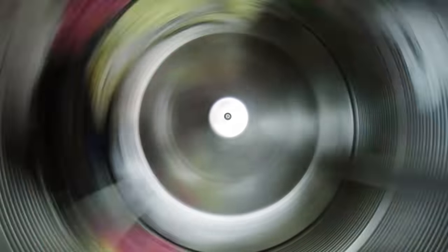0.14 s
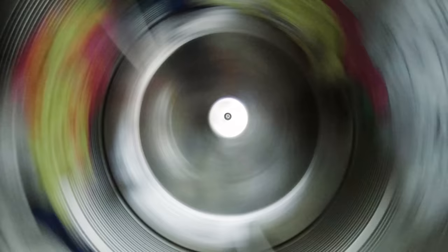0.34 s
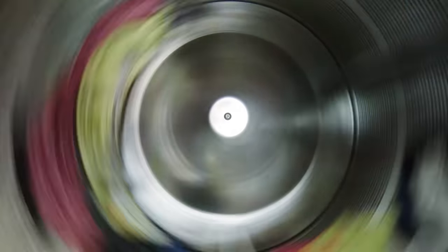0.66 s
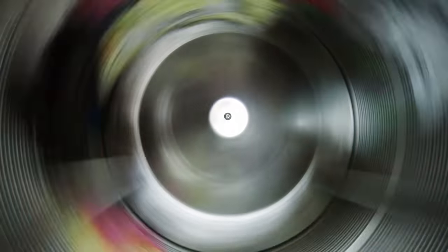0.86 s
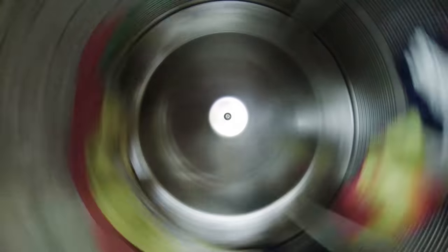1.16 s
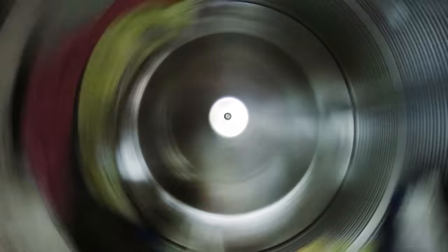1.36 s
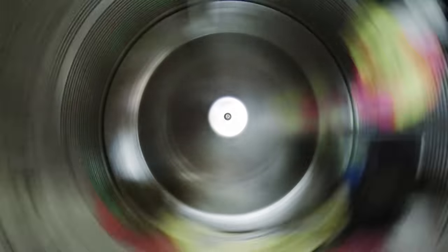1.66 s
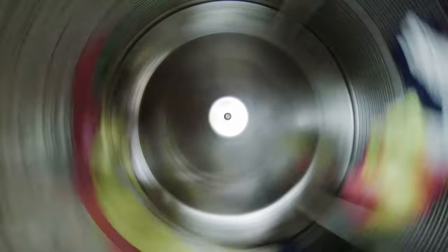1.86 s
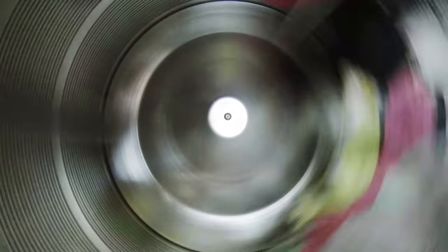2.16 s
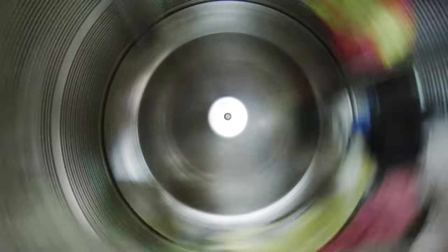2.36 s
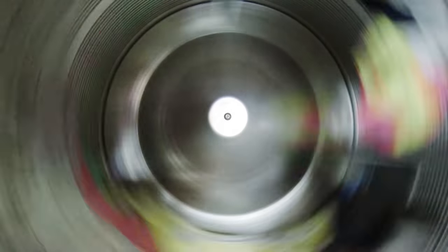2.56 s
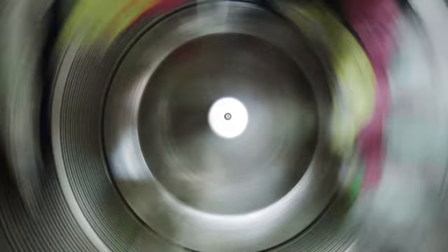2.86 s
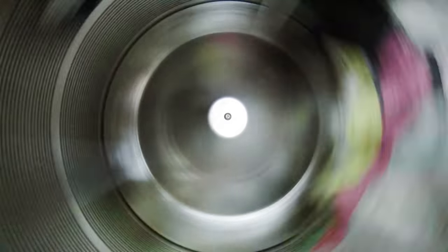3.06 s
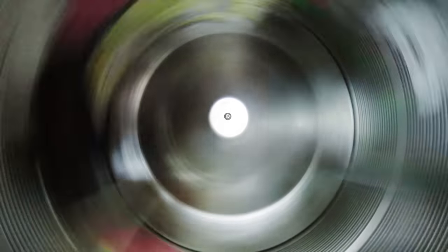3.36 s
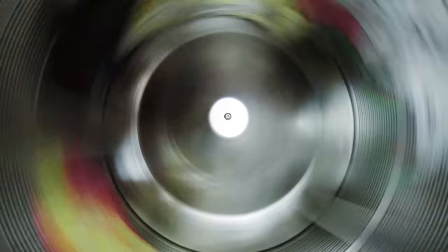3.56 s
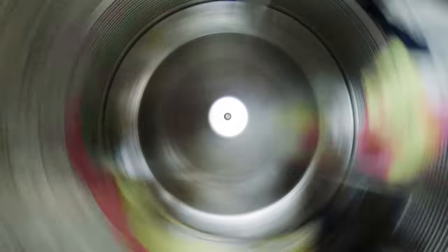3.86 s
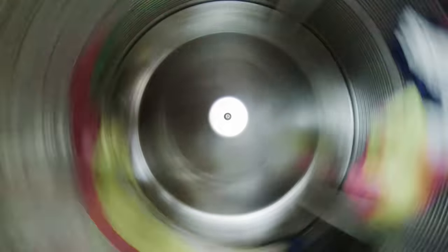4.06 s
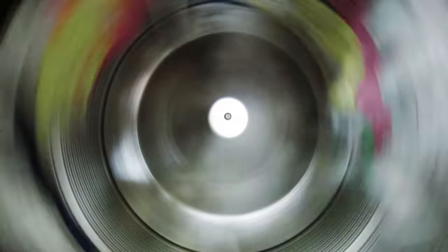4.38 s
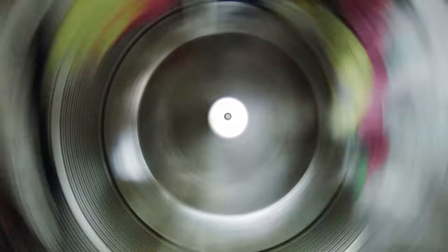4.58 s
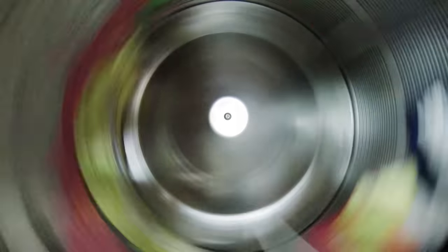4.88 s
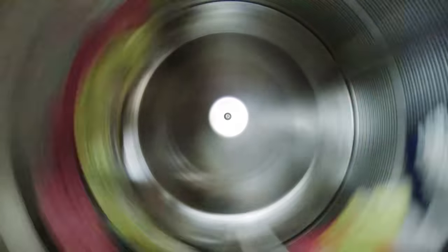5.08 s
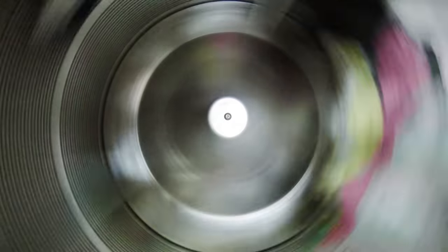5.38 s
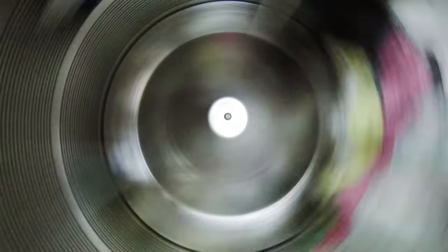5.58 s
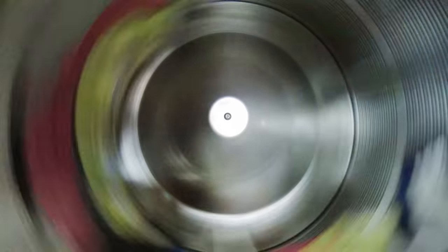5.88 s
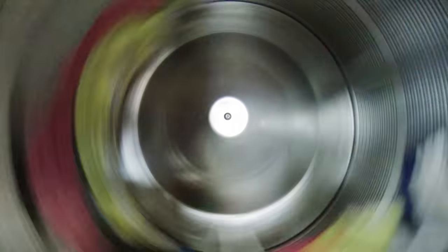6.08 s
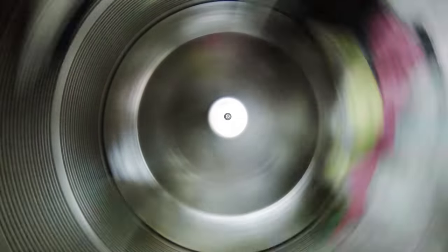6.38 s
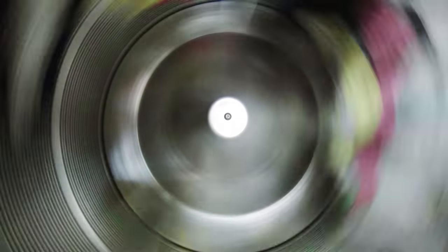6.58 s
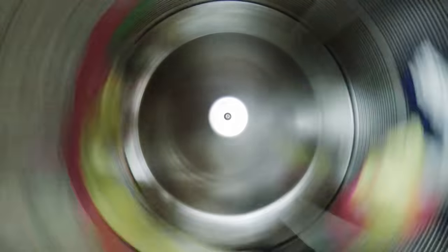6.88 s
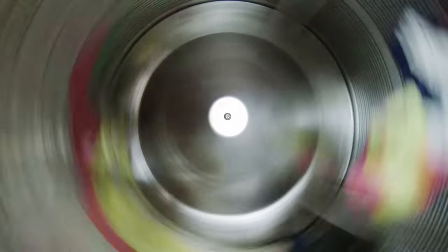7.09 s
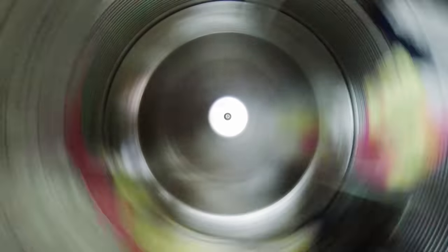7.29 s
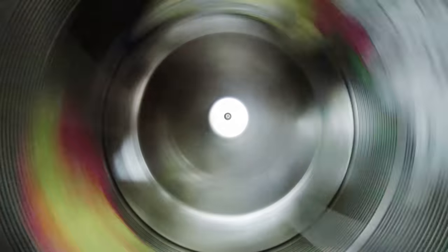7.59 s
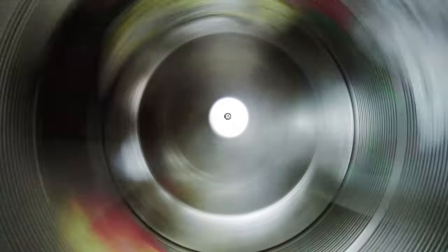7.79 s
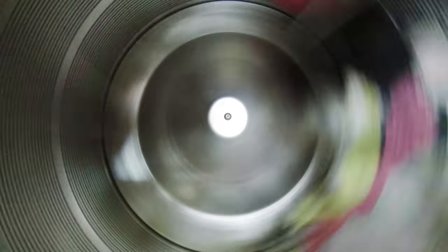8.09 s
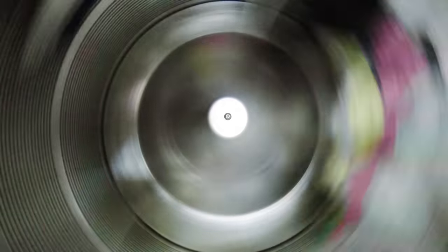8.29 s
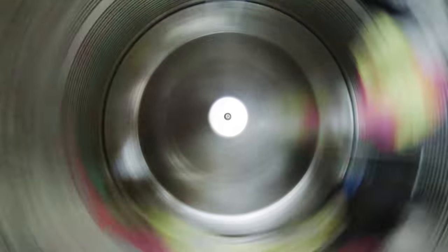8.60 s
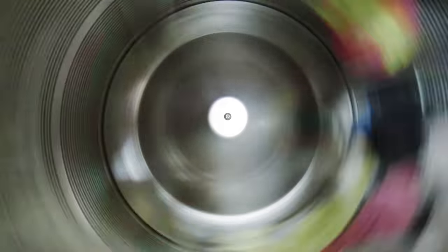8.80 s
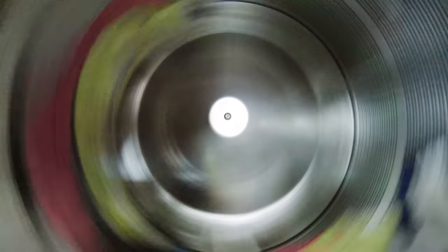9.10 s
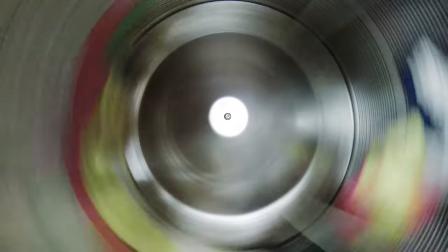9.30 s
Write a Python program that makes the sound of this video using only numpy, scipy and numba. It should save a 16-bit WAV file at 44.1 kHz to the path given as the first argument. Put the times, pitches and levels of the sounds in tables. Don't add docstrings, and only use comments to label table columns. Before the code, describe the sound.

Close up at a washing machine's steel drum gathering speed. Deep cabinet rumble and steady motor hum carry a rough, slowly rising drone. The uneven load swishes about four times a second at first, quickening past five. Dull thumps on the tub are scattered early, then come nearly every turn, with small button and zip ticks over airy drum noise. It breaks off still spinning.

```python
import sys
import numpy as np
from scipy import signal
from scipy.fft import rfft, irfft
from scipy.io import wavfile
from scipy.ndimage import uniform_filter1d
from numba import njit

SR = 44100
rng = np.random.default_rng(int(sys.argv[2]) if len(sys.argv) > 2 else 0)


def ratio(d):
    e = np.asarray(d, float) / 20
    return 10 ** e


def wav_record(signal):
    frames = np.transpose(np.atleast_2d(signal))
    bounded = np.clip(frames, -1, 1)
    quanta = np.round(bounded * 32767).astype(np.int16)
    wavfile.write(sys.argv[1], SR, quanta)


N = 416744
TIME = np.arange(N) / SR
FREQ = np.fft.rfftfreq(N, 1 / SR) + 1e-3

START_TURNS_S, GAIN_TURNS_S2, EASE_TURNS_S3 = 4.031, .177, .00288
SHAFT_ORDERS = [6.985, 7.745, 11.585, 28.485, 42.075]
SHAFT_DRIVE_DB = [-24, -28.5, -22, -29.5, -29]
# order [cycles per drum turn], level_db [dB re belt tone]
SIDE_TONES = [(25.9, -5), (26.75, -5), (23.17, -11)]
# order [cycles per drum turn], level_db [dB]
GEAR_TONES = [(58.1, -52), (69.9, -53), (74.0, -50), (135.9, -61), (150.7, -58)]
# pitch_hz [Hz], width_hz [Hz], boost_db [dB]
CASE_RESONANCES = [(31.46, 1.8, -3.5), (37.74, 3.2, -2.5), (63.6, 5.7, 1), (133.1, 20, -4), (152.9, 22, -1),
                   (208.3, 29, -0.5), (313, 45, -2.5), (681, 88, 1.5), (744, 25, 3)]
# pitch_hz [Hz], width_hz [Hz]
PANEL_MODES = [
    (36.9, 12),
    (62.8, 8.4),
    (202.1, 11.7),
    (151.4, 45),
]
PANEL_TONES = [(0, 1), (2,), (4,), (3,)]
# start_db [dB], rise_db_per_s [dB/s], wander_db [dB], swell_s [s]
PANEL_REST = [(-25.5, 0.07, 3, .06), (-31.5, 0.08, 0.5, 0.063), (-25, -0.31, 1.8, 0.044),
              (-38.5, 1.69, 3, 0.046)]
# peak_s [s], level_db [dB]
SIDE_SWELLS = [(.07, -20), (.34, -18.5), (.9, -22), (2.42, -21), (2.64, -14), (2.88, -18), (3.29, -26),
               (3.51, -18.5), (5.03, -29.5), (5.21, -17.5), (6.64, -21), (7.26, -17), (7.95, -14),
               (8.17, -13.5), (8.43, -15.5), (9.41, -17.5)]
# peak_s [s], level_db [dB]
TUB_LURCHES = [(.08, -25.5), (1.16, -28), (2.49, -21), (2.94, -24), (3.13, -20.5), (3.57, -24.5),
               (4.1, -29), (4.84, -22), (5.21, -26), (5.54, -21), (5.96, -19.5), (6.34, -24), (6.93, -17),
               (7.3, -21.5), (7.42, -19.5)]
# peak_s [s], level_db [dB]
BACK_LURCHES = [(.05, -15.5), (.27, -23.5), (.49, -21.5), (1.3, -26), (1.56, -20), (1.71, -16),
                (2.4, -16.5), (2.79, -22.5), (2.88, -22.5), (3.62, -20), (3.88, -19.5), (4.63, -15.5),
                (4.86, -15), (5.54, -18)]
# peak_s [s], level_db [dB]
FRAME_LURCHES = [(1.16, -32), (2.03, -23.5), (2.42, -25.5), (2.97, -27.5), (4.05, -21.5), (5.12, -21.5),
                 (5.42, -20.5), (8.4, -19.5), (9.3, -18)]
# pitch_hz [Hz], level_db [dB per Hz]
RUMBLE_COLOUR = [(15, -44.5), (24, -7.5), (48, 0.5), (75, -0.5), (92, -10.5), (120, -3), (160, -1.5),
                 (235, -6.5), (270, -20), (330, -20), (400, -29.5), (510, -32.5), (900, -46.5)]
# pitch_hz [Hz], level_db [dB rms]
MAINS_TONES = [(120, -35), (239.99, -38), (359.97, -49.6), (10429.6, -91), (12647.4, -96), (12707.3, -95),
               (13126.9, -92)]
# pitch_hz [Hz], level_db [dB per Hz]
ROAR_COLOUR = [(400, -29.5), (520, -17.5), (780, -23), (1040, -21.5), (1250, -11), (1550, -8), (2160, -9),
               (2660, -23), (3450, -25), (4410, -37.5), (6140, -41.5), (9000, -46.5), (13300, -49),
               (15100, -51)]
# pitch_hz [Hz], width_hz [Hz], boost_db [dB over the roar]
DRUM_AIR = [(597.6, 29, 11.5), (664, 93, 12), (739, 22, 9), (909, 230, 7), (1148, 100, 4), (1320, 35, -4.5),
            (1350, 74, 5.5), (1437, 51, 5.5), (1695, 118, 10), (1824, 75, 2), (2340, 100, -1.5),
            (2333, 100, -4), (2470, 140, 4), (2940, 130, 3.5), (3870, 330, 3), (5145, 590, 7),
            (7980, 410, 4.5), (10230, 350, 4.5), (11100, 500, 3)]
# place [share of the turn], level_db [dB]
SWEEP = [(.08, 2.1), (.2, 0.6), (.32, 1.5), (.42, -1), (.58, -2.5), (.75, -2.15), (.9, -2.3)]
# pitch_hz [Hz], level_db [dB per Hz]
HISS_COLOUR = [(2500, -18.5), (4000, -3.5), (9000, -8.0), (14000, -6), (15100, -16)]
# crest_s [s], peak_db [dB], sharp_db [dB]
KNOCKS = [(0.077, -19, -46), (0.248, -16, -39), (0.753, -9.5, -20), (1.047, -12, -30), (2.205, -11.5, -37),
          (2.877, -14.5, -38), (3.098, -16, -39), (3.747, -8, -23), (4.172, -10.5, -31),
          (4.377, -8.5, -21.5), (4.794, -12.5, -29), (5.21, -12.5, -30), (5.413, -16, -40), (5.81, -8, -24),
          (6.009, -16, -40), (6.41, -12.5, -34.5), (6.795, -9, -22), (6.988, -16.5, -36),
          (7.181, -9, -24.5), (7.37, -7, -21), (7.751, -8.5, -25), (7.936, -10.5, -26.5), (8.123, -8, -32),
          (8.307, -8, -22), (8.492, -12.5, -34), (8.677, -9, -20.5), (8.859, -8, -24.5),
          (9.045, -8.5, -28.5), (9.221, -6, -19), (9.401, -12.5, -48)]
# start_s [s], peak_db [dB], bright_db [dB]
TICKS = [(0.6004, -52.5, -59), (0.7522, -50.5, -63), (0.766, -48.5, -65), (0.7754, -61, -68),
         (1.6162, -48, -65.5), (1.9818, -61.5, -59), (2.077, -51.5, -68), (2.7283, -55.5, -70),
         (2.951, -53.5, -61.5), (2.977, -55.5, -56.5), (3.4437, -53.5, -69), (4.376, -47, -76),
         (5.679, -50.5, -66), (5.8122, -50, -66), (6.7955, -46, -64), (6.933, -49.5, -63),
         (7.1753, -48, -60), (7.2634, -58, -57), (7.3703, -46.5, -70), (7.6262, -55.5, -64),
         (8.058, -49, -67.5), (8.0651, -46, -66.5), (8.1495, -45, -71), (8.552, -50, -63),
         (8.5802, -46, -58), (8.677, -50.5, -68), (8.8083, -52, -62), (8.971, -53.5, -61.5),
         (9.0384, -50.5, -69), (9.2212, -50.5, -59)]
# peak_db [dB], pitch_hz [Hz], t60_s [s]
THUD = (-8, 62, .8)


def unit(x):
    return x / np.sqrt(np.mean(x ** 2))


def walk(rate):
    hold = int(SR / rate)
    levels = np.resize(rng.standard_normal(size=512), N // hold + 1)
    steps = np.repeat(levels, hold)
    smooth = uniform_filter1d(uniform_filter1d(steps, hold), hold)
    return unit(smooth[:N])


def bell(hz, width):
    return 1 / np.sqrt(1 + ((FREQ - hz ** 2 / FREQ) / width) ** 2)


def colour(points):
    hz, db = np.transpose(points)
    return ratio(np.interp(np.log(FREQ), np.log(hz), db, left=-120, right=-120))


def noise(gain):
    return irfft(rfft(rng.standard_normal(N)) * gain, N)


def tone(db, cycles):
    return np.sqrt(2) * ratio(db) * np.sin(2 * np.pi * cycles)


def add(out, s, sound):
    i = int(s * SR)
    out[i:i + len(sound)] += sound[:N - i]


def treble_only(x):
    return signal.sosfilt(signal.butter(2, 3500, "high", fs=SR, output="sos"), x)


@njit
def follow(x, attack, release):
    e, out = 0., np.empty(len(x))
    for i in range(len(x)):
        e += (abs(x[i]) - e) * (attack if abs(x[i]) > e else release)
        out[i] = e
    return out


def through_case(hz):
    power = sum(ratio(2 * db) / (1 + ((hz - centre) / (width / 2)) ** 2) ** 2
                for centre, width, db in CASE_RESONANCES)
    return 10 * np.log10(power)


def shafts(turns, levels_db):
    tones = list(zip(SHAFT_ORDERS, levels_db))
    tones += [(order, levels_db[3] + db) for order, db in SIDE_TONES]
    return sum(tone(db + 1.2 * walk(6.5), order * turns + .2 * walk(3.1) / (2 * np.pi))
               for order, db in tones)


def gears(speed, turns):
    out = 0
    for order, db in GEAR_TONES:
        level_db = db + 1 + through_case(order * speed) + 2.5 * walk(3.4)
        out = out + tone(level_db, order * turns + .9 * walk(6) / (2 * np.pi))
    return out


def shake(rest, swells):
    db, db_per_s, wander_db, swell_s = rest
    power = ratio(2 * (db + db_per_s * TIME + wander_db * walk(12)))
    for s, top_db in swells:
        power = power + ratio(2 * top_db) * np.exp(-((TIME - s) / swell_s) ** 2)
    return 10 * np.log10(power)


def ringing(hz, width, steady):
    z = signal.hilbert(noise(bell(hz, width) ** 2))
    return unit(np.real(z / np.abs(z) ** np.clip(steady, 0, 1)))


def cabinet(levels_db):
    out, jolt_power = thud()
    swells = (SIDE_SWELLS, TUB_LURCHES, BACK_LURCHES, FRAME_LURCHES)
    shakes_db = map(shake, PANEL_REST, swells)
    for k, (mode, db, tones) in enumerate(zip(PANEL_MODES, shakes_db, PANEL_TONES)):
        driven = sum(ratio(2 * levels_db[i]) for i in tones)
        driven = driven + jolt_power * (k == 1)
        shaken = ratio(2 * db) / (1 + 25 * driven / ratio(2 * db))
        out = out + ratio(-1.5) * np.sqrt(shaken) * ringing(*mode, steady=0.65)
    rumble_db = -27 + 0.9 * walk(6.0) + 0.39 * TIME
    return out + ratio(rumble_db) * unit(noise(colour(RUMBLE_COLOUR)))


def mains():
    return sum(tone(db, hz * TIME + rng.random()) for hz, db in MAINS_TONES)


def roar(sweep_db, slow_db):
    boost_db = sum(db * bell(hz, width) ** 2 for hz, width, db in DRUM_AIR)
    whole = rfft(rng.standard_normal(N)) * colour(ROAR_COLOUR) * ratio(boost_db)
    out, octaves = 0, np.log2(FREQ / 400)
    for k in range(12):
        share = np.cos(np.pi / 2 * np.clip(2 * octaves - k, -1, 1)) ** 2
        depth = np.interp(k, [0, 3, 6, 11], [0.72, 0.42, 0.85, 0.81])
        flicker_db = np.interp(k, [0, 6, 11], [.6, 1.2, 2.2]) * walk(38)
        out = out + ratio(depth * sweep_db + flicker_db) * irfft(whole * share, N)
    return unit(out) * ratio(slow_db + 17.0)


def hiss():
    return ratio(-79.0) * unit(noise(colour(HISS_COLOUR)))


def patter(sweep_db):
    t = TIME[:400]
    chance = rng.random((3, N))
    hits = chance[0] < 200 / SR * ratio(2.5 * sweep_db + 6 * walk(30))
    sizes = ratio(-3.5 * np.log(chance[2] + 1e-9))
    grains = hits * np.sign(chance[1] - .5) * sizes
    grains = np.convolve(grains, rng.standard_normal(len(t)) * np.exp(-t / 0.00087))[:N]
    return treble_only(ratio(-79.5) * unit(irfft(rfft(grains) * bell(6700, 7000) ** 2, N)))


def blow(s, db, hz, rise_s):
    t = np.arange(int(16 * rise_s * SR)) / SR
    swell = (t / (2 * rise_s)) ** 2 * np.exp(2 - t / rise_s)
    return s - 2 * rise_s, ratio(db) * swell * np.cos(2 * np.pi * hz * (t - 2 * rise_s))


def knocks():
    out = np.zeros(N)
    for (s, db, sharp_db), spread in zip(KNOCKS, rng.standard_normal(len(KNOCKS))):
        add(out, *blow(s, db + 1.5, 175 * (1 + 0.01 * spread), 0.0047))
        add(out, *blow(s, sharp_db - 0.5, 306, 0.0031))
        add(out, *blow(s, sharp_db - 12.5, 436, .0045))
    return out


def ticks():
    out, t = np.zeros(N), TIME[:400]
    for s, db, bright_db in TICKS:
        dull, bright = rng.standard_normal((2, len(t))) * np.exp(-t / 0.0013)
        add(out, s, ratio(db - 0.5) * signal.lfilter(*signal.iirpeak(5600, 2.5, SR), 2 * dull))
        add(out, s, ratio(bright_db + 4.5) * signal.lfilter(*signal.iirpeak(10200, 2.5, SR), 2 * bright))
    return treble_only(out)


def thud():
    db, hz, t60 = THUD
    t = np.maximum(TIME - .761, 0)
    size = ratio(db - 60 * t / t60) * (1 - np.exp(-t / 0.0016))
    return size * np.sin(2 * np.pi * hz * t), size ** 2 / 2


def scene():
    speed = START_TURNS_S + GAIN_TURNS_S2 * TIME - EASE_TURNS_S3 * TIME ** 2 / 2
    turns = np.cumsum(speed) / SR
    levels_db = [db + through_case(order * speed) for order, db in zip(SHAFT_ORDERS, SHAFT_DRIVE_DB)]
    sweep_db = np.interp(turns, *np.transpose(SWEEP), period=1) + 0.42 * walk(40)
    air_db = -56 + 2.36 * (speed - START_TURNS_S)
    drive = shafts(turns, levels_db) + gears(speed, turns) + mains()
    body = cabinet(levels_db) + knocks()
    drum = roar(sweep_db, air_db) + patter(sweep_db) + ticks()
    return (drive + body + drum + hiss())[None]


def roll_off(x):
    return signal.sosfilt(signal.butter(12, 15190, fs=SR, output="sos"), x)


def record(dry):
    envelope = follow(dry[0], 1 / (0.0036 * SR), 1 / (.09 * SR))
    gain = np.minimum(1, (0.23 / (envelope + 1e-9)) ** .5)
    gain *= np.minimum(1, TIME / .008)
    return roll_off(dry * gain)


dry = scene()
out = record(dry)
wav_record(out)
```